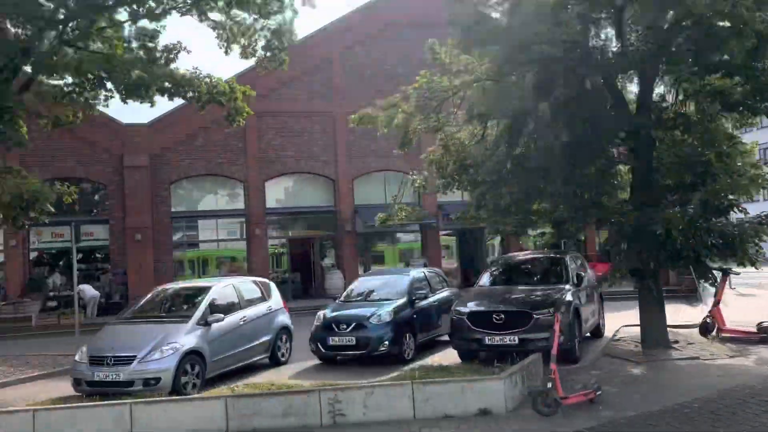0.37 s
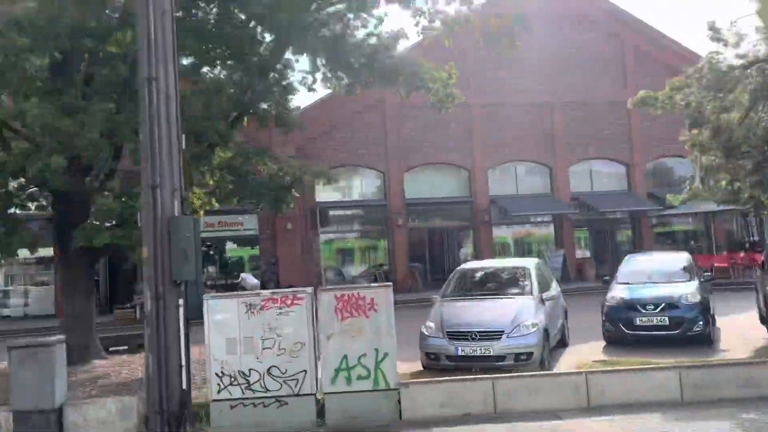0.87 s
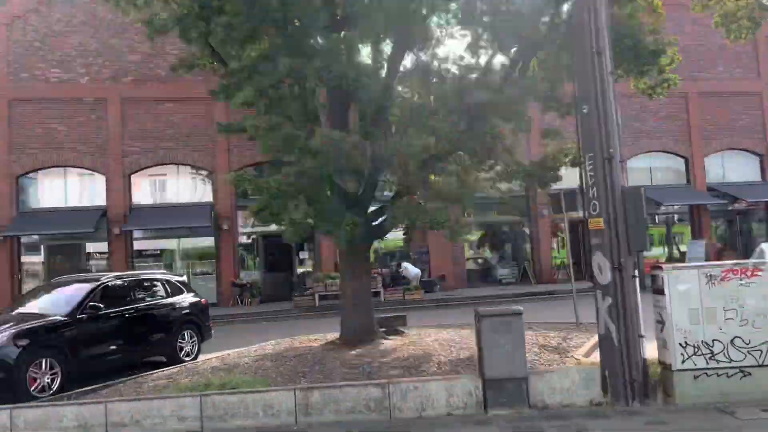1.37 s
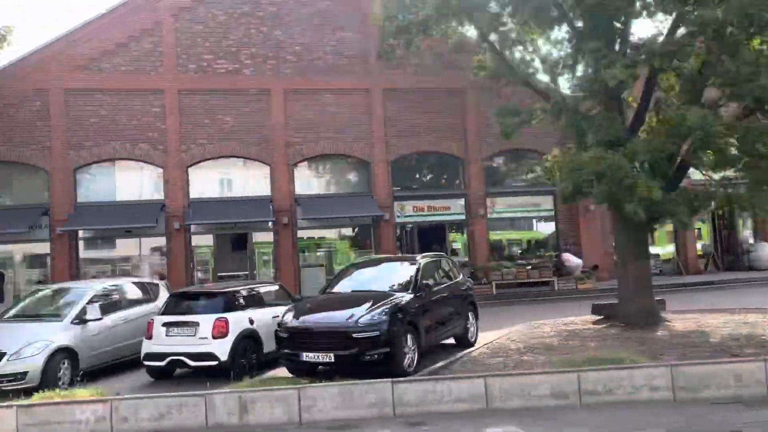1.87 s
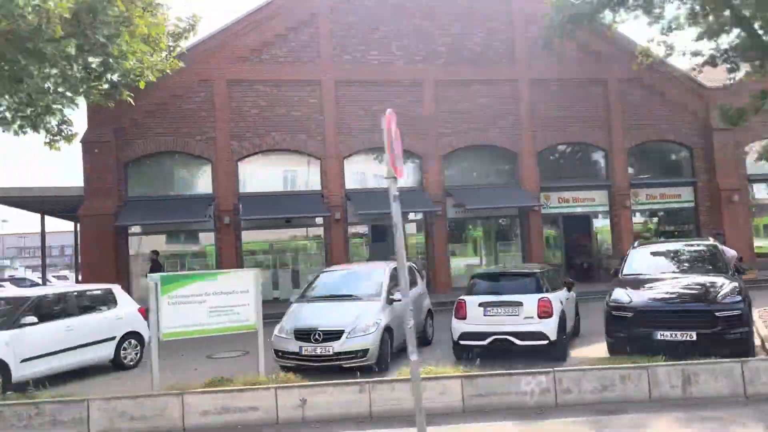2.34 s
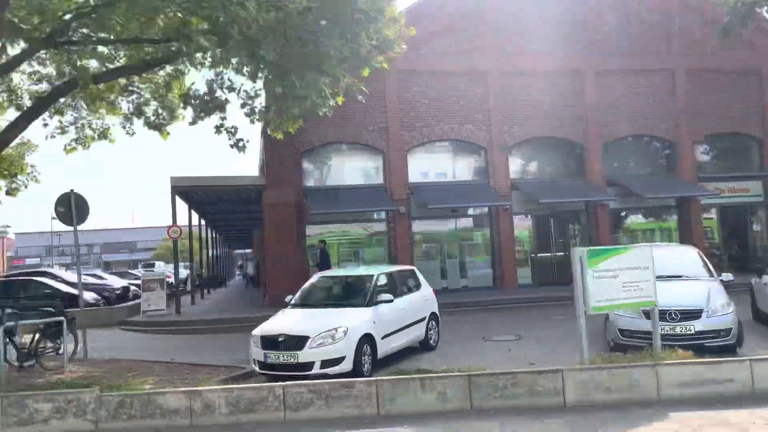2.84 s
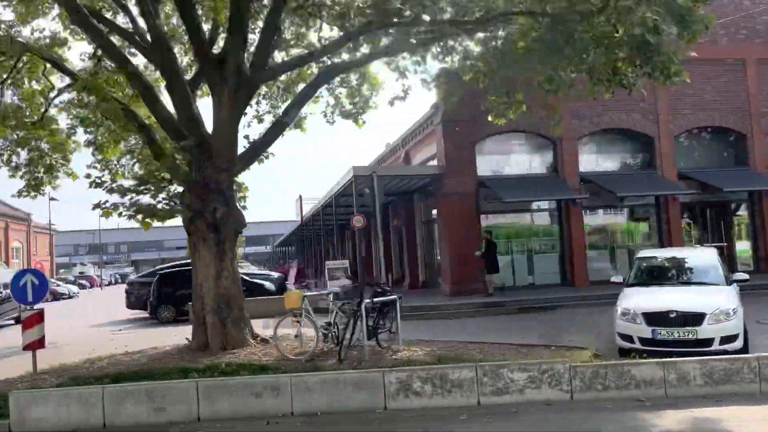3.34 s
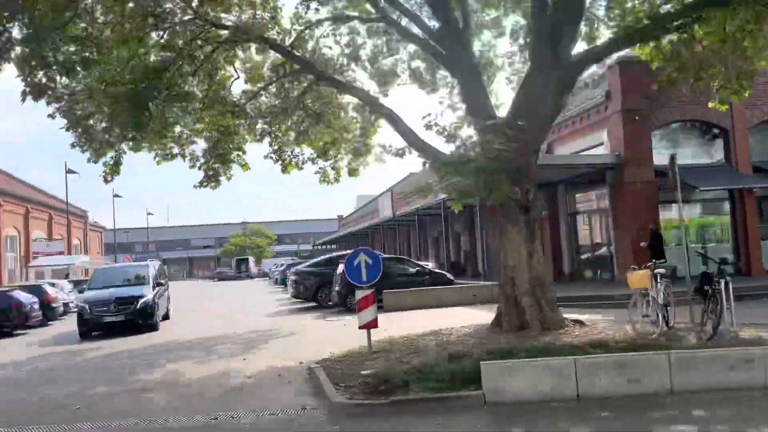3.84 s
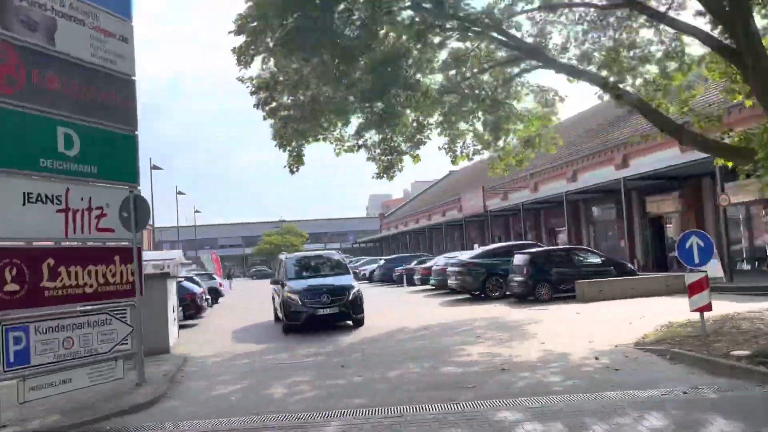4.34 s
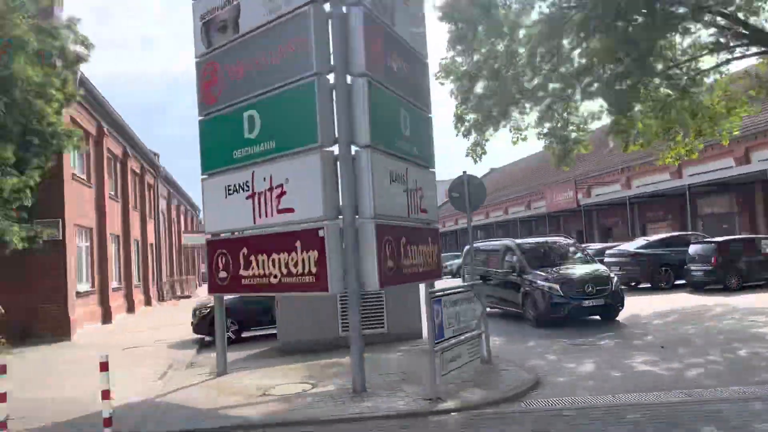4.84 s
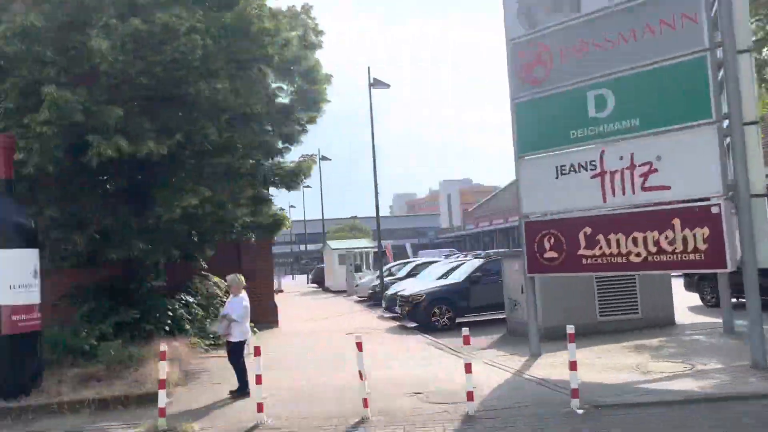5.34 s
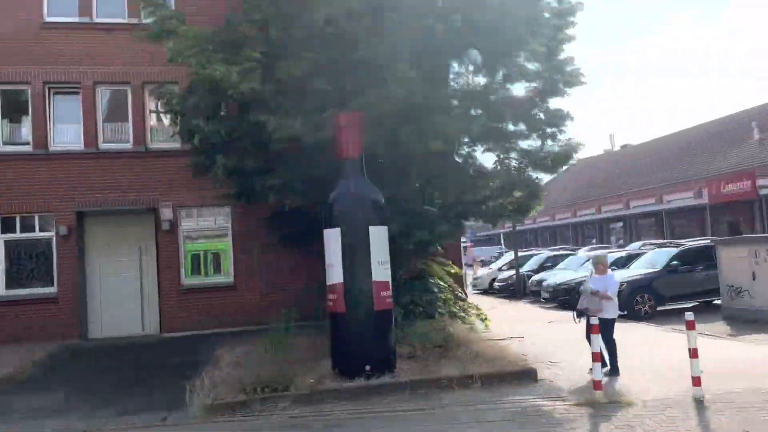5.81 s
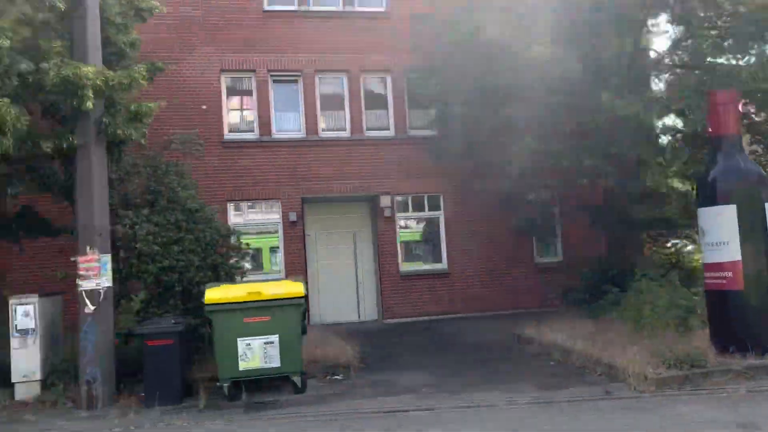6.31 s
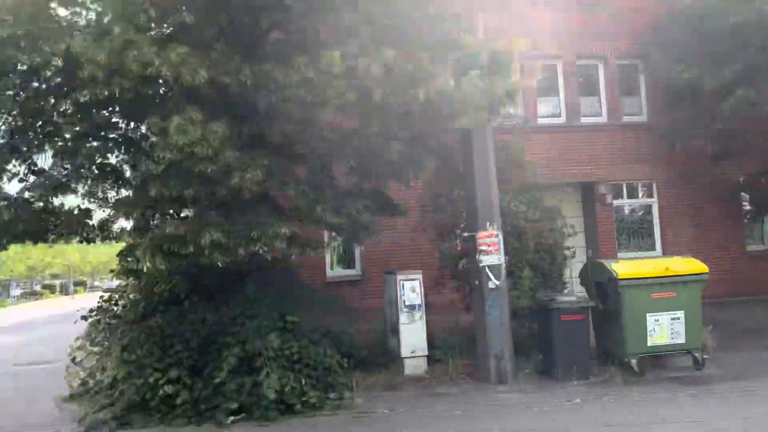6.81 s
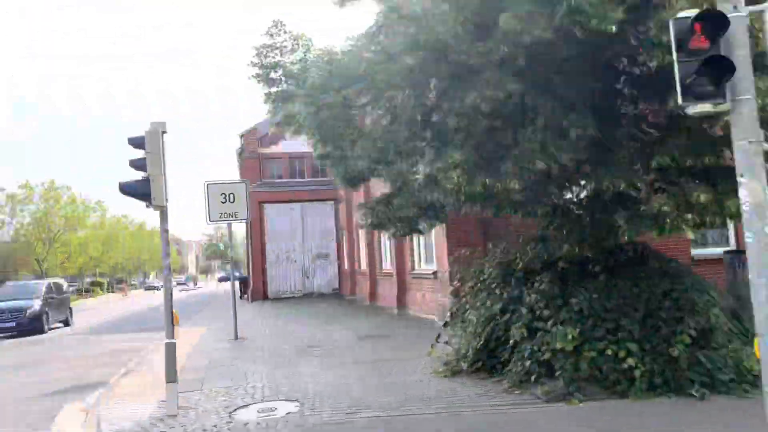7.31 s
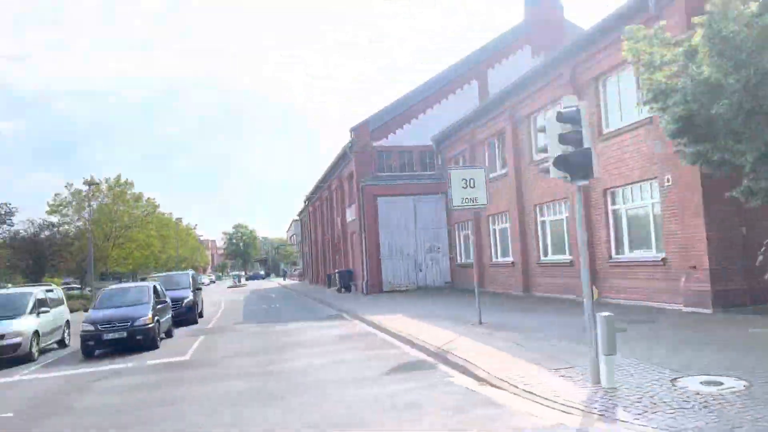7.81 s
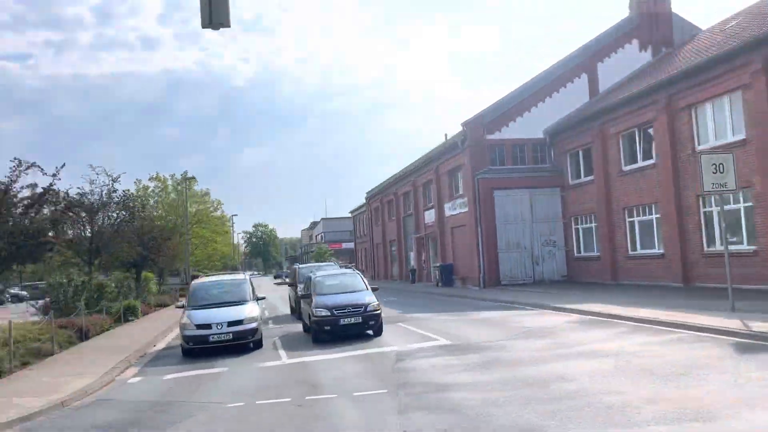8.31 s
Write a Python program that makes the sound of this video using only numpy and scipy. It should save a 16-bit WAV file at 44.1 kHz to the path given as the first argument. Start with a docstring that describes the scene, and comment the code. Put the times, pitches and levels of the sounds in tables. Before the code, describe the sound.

Inside a moving light-rail car, a phone near the window picks up a heavy floor rumble with rapid, overlapping low booms, thuds and gritty steel grinding as wheels cross points. Brief wheel rings colour the clatter. After about two seconds it eases, booms thin out, and a softer rumble with cabin roar and faint air hiss remains. Small fittings tick; near the end low booms and faint squeals return.

```python
"""A heavy rumble and dense body booms, with gritty flange bursts over points; then a smoother run.
Inside a light-rail car leaving a curve: shaped noise makes the floor rumble, cabin roar and air rush,
swelling tones make the booms, disc slips and squeals, noise bursts the grinding, thuds and ticks.
A phone by the window hears it in stereo, the channels' likeness and phase varying with frequency."""
import sys
import numpy as np
from scipy import signal
from scipy.fft import rfft, irfft, next_fast_len
from scipy.io import wavfile
from scipy.ndimage import uniform_filter1d

SR = 44100
rng = np.random.default_rng(int(sys.argv[2]) if len(sys.argv) > 2 else 0)


def rack_gain(trim_db):
    """Turn a fader trim in dB into the linear factor to multiply a signal by."""
    fader = np.asarray(trim_db, float)
    return 10 ** (fader / 20)


def generate_wav(sig):
    """Save sig (samples, or channels by samples) to the path in sys.argv[1] as 16-bit PCM at SR."""
    pcm = np.round(np.clip(np.atleast_2d(sig).T, -1, 1) * 32767).astype(np.int16)
    wavfile.write(sys.argv[1], SR, pcm)


N = 382347
SIZE = next_fast_len(N)
HZ = np.maximum(np.fft.rfftfreq(SIZE, 1 / SR), 1)
TIME_S = np.arange(N) / SR

# Levels are nominal: walks, flicker and the stereo balance still act on them.
# track state, rough over the points, smoother after: time_s, rumble_db, roar_db, contact_db
TRACK = [(0, -12.5, -26, -42.5), (.6, -14.5, -27, -34.5), (1.2, -12.5, -28, -39), (2.1, -15, -27.5, -38.5),
         (2.5, -17.5, -29, -42.5), (3.2, -18.5, -30.5, -44.5), (3.5, -20, -32, -44),
         (3.8, -22.5, -32, -43.5), (4.6, -21, -31, -47), (5.0, -23.5, -32.5, -50.5),
         (5.6, -23.5, -30.5, -48.5), (6.0, -25.5, -30, -47), (6.5, -25.5, -29.5, -45.5),
         (7.3, -24.5, -29, -43.5), (8.0, -24, -28.5, -42), (8.67, -21, -28, -40)]
# noise colours, relative: freq_hz, density_db
RUMBLE_COLOUR = [(20, -26.5), (35, -20), (45, -23), (60, -9), (85, -2.5), (130, -4), (200, -6.5),
                 (250, -10.5), (300, -18.5), (400, -23.5), (600, -40), (1200, -69.5), (16000, -130)]
ROAR_COLOUR = [(200, -5), (250, -3), (330, -14.5), (430, -10.5), (550, -3.5), (700, -9), (850, -10.5),
               (1000, -6.5), (1450, -12.5), (1800, -20)]
SCRAPE_COLOUR = [(250, 27), (330, 24.5), (550, 10), (850, 19), (1000, 0.5), (1450, 12), (1620, -2),
                 (1800, -1), (2400, -4.5), (2900, -2.5), (3400, -4.5), (4000, -11.5), (4800, -14.5),
                 (6500, -11.5), (8000, -23), (10500, -28), (12000, -36.5), (15000, -46.5)]
AIR_COLOUR = [(1300, 8), (1700, -1), (2500, -1), (3300, -6.5), (4000, -12.5), (4800, -21), (5600, -19),
              (6500, -19), (7500, -32), (9000, -39.5), (10000, -36), (12000, -58), (15000, -55.5)]
# floor and cabin resonances, negative cuts: freq_hz, width_hz, rise_db
CABIN_MODES = [(47.8, 34.4, 17), (102, 13, 4.5), (162, 75, 1.5), (237, 77, 6.5), (324.3, 39, 5),
               (402.4, 79, 4.5), (450.6, 64, 5), (657, 88, 4.5), (750, 170, 6), (1209, 130, 6.5),
               (1314, 59, -5), (2060, 21, 7), (2500, 83, 4), (3080, 78, 2.5), (3780, 8.2, -2.5),
               (4240, 78, 7), (4900, 99, 2.5), (5450, 520, 0.5), (6330, 180, -2.5)]
# body modes: freq_hz, level_db at BODY_AT_DB of rumble, gain_db_per_rumble_db, pitch_blur (0-1)
BODY_MODES = [(83, -27.5, 0.88, .07), (105.6, -29, 0.8, 0), (160.1, -27, 0.75, 0.05),
              (228, -40, 0.36, 0.02)]
# loud body booms: peak_s, pitch_hz, peak_db, length_s
BOOMS = [(0.173, 165.6, -11, 0.05), (0.344, 101.9, -9.5, 0.068), (0.394, 231, -16.5, 0.044),
         (0.43, 91.5, -13.5, 0.09), (0.511, 101.8, -7, 0.056), (0.61, 91.24, -11, 0.035),
         (0.613, 250, -15.5, 0.053), (0.636, 223, -17.5, 0.056), (0.659, 71.5, -11.5, 0.05),
         (0.694, 157.6, -9.5, 0.063), (0.824, 99, -12, 0.07), (0.88, 228, -15.5, 0.069),
         (0.927, 77.8, -13, 0.09), (1.012, 86.8, -10.5, 0.04), (1.064, 93.5, -8.5, 0.02),
         (1.129, 218, -17, 0.066), (1.138, 191, -20, 0.036), (1.205, 119.3, -14.5, 0.04),
         (1.242, 202, -13, 0.044), (1.245, 92, -13, 0.048), (1.285, 88.2, -12, 0.04),
         (1.341, 86.35, -10, 0.031), (1.368, 242, -21.5, 0.07), (1.376, 160, -12.5, 0.032),
         (1.437, 155.4, -11, 0.054), (1.439, 223, -17, 0.04), (1.507, 226, -17.5, 0.09),
         (1.552, 86.5, -15, 0.058), (1.636, 85.7, -12, 0.071), (1.725, 101.5, -9.5, 0.048),
         (1.768, 85.8, -15.5, 0.09), (1.86, 85.9, -11, 0.09), (1.873, 226.4, -13.5, 0.052),
         (1.921, 218.5, -19.5, 0.09), (1.97, 147.4, -15.5, 0.075), (2.041, 145.6, -14.5, 0.061),
         (2.054, 218.6, -18, 0.08), (2.12, 175.2, -11.5, 0.047), (2.186, 153.8, -16, 0.091),
         (2.293, 193.3, -16.5, 0.032), (2.3, 72.3, -15, 0.038), (2.355, 97.2, -11.5, 0.04),
         (2.424, 74.7, -13.5, 0.04), (2.432, 161.6, -17.5, 0.04), (2.506, 102, -12.5, 0.04),
         (2.506, 226, -17, 0.04), (2.579, 101.6, -20, 0.081), (2.639, 98.8, -11.5, 0.09),
         (2.723, 83, -20.5, 0.061), (2.841, 83, -16, 0.047), (2.903, 235.8, -17.5, 0.04),
         (2.958, 86.4, -16, 0.11), (3.097, 83, -12.5, 0.04), (3.176, 88, -16.5, 0.057),
         (3.234, 95.7, -16.5, 0.035), (3.229, 164.1, -10.5, 0.028), (3.29, 158.4, -22, 0.076),
         (3.336, 83, -17.5, 0.036), (3.348, 153.4, -19, 0.07), (3.416, 164, -20, 0.12),
         (3.42, 94.06, -20.5, 0.04), (3.641, 78.8, -25.5, 0.05), (3.698, 91.5, -19.5, 0.07),
         (3.8, 228, -18, 0.032), (3.807, 78, -14.5, 0.059), (3.899, 164.6, -19.5, 0.034),
         (4.029, 83, -19.5, 0.036), (4.18, 78.34, -14.5, 0.041), (4.311, 86, -18, 0.04),
         (4.511, 80.3, -16.5, 0.04), (4.565, 85.1, -23.5, 0.09), (4.97, 156.4, -22, 0.05),
         (5.127, 233.7, -23.5, 0.058), (5.206, 153.5, -21.5, 0.056), (7.692, 107.6, -14.5, 0.065),
         (7.79, 105, -14.5, 0.11), (7.968, 106.5, -15, 0.12), (8.215, 110, -25, .05),
         (8.318, 108.5, -13.5, 0.059), (8.638, 108, -8.5, 0.17), (8.66, 153.3, -20, 0.04)]
# flanges grinding over points and joints, contact gain: peak_s, peak_db, length_s
GRINDS = [(0, -25.5, 0.1), (0.217, -35.5, 0.16), (0.515, -27.5, 0.088), (0.745, -25.5, 0.1),
          (1.22, -33.5, 0.037), (1.287, -35.5, .12), (1.484, -28.5, 0.14), (1.918, -38, 0.15),
          (2.129, -39, 0.18), (3.073, -40.5, 0.055), (3.697, -44.5, 0.07), (7.23, -52, 0.08),
          (7.838, -42.5, .1), (8.63, -40.5, 0.087)]
# wheels thudding onto crossings, gain before THUMP_DB: peak_s, peak_db, length_s
THUDS = [(0, -30.5, 0.043), (0.448, -28.5, 0.12), (0.708, -26, 0.15), (0.867, -34.5, 0.043),
         (1.225, -32.5, 0.056), (1.305, -34, .05), (1.427, -26.5, 0.15), (1.876, -36.5, 0.089),
         (2.074, -31, 0.067)]
# wheel disc rings: freq_hz, width_hz, level_re_roar_db
DISC_RINGS = [(470, 37, -10.5), (657, 24, -13), (769, 70, -11.5), (1290, 137, -9.5)]
# discs singing loudest as they slip: peak_s, pitch_hz, peak_db, length_s
SLIPS = [(.40, 470, -31, 0.06), (.41, 752, -27, .1), (.45, 690, -32.5, 0.12), (.45, 1340, -31, 0.055),
         (.52, 1290, -32.5, 0.089), (.56, 750, -27.5, 0.15), (.62, 1245, -34, .04),
         (.69, 1220, -32.5, 0.08), (.70, 660, -31, 0.13), (.72, 786, -32, 0.17), (.9, 747, -25, 0.11),
         (.89, 664, -30.5, .06), (.92, 470, -29.5, 0.068), (1.15, 780, -29.5, .1),
         (1.24, 712, -29.5, 0.054), (1.27, 776, -26, 0.14), (1.255, 1330, -31, 0.05),
         (1.29, 1270, -31.5, .05), (1.40, 470, -32.5, 0.17), (1.47, 720, -33, .1), (1.56, 650, -34, .15),
         (1.88, 755, -25.5, 0.11), (1.98, 787, -27, 0.15), (1.93, 1350, -32.5, 0.13),
         (1.8, 1240, -36, 0.21), (6.53, 470, -34, 0.15), (7.6, 655, -38, 0.41), (7.96, 650, -32.5, 0.15),
         (8.15, 470, -31.5, 0.13), (8.60, 470, -31.5, 0.1)]
# thin squeals of slipping steel: peak_s, peak_db, length_s, start_hz, end_hz
SQUEALS = [(1.495, -42, .06, 2950, 2890), (7.225, -48, .04, 2700, 2915), (7.253, -54, 0.041, 2370, 2280),
           (7.815, -69, .17, 5510, 5540), (7.9, -53, 0.046, 3080, 3070), (8.05, -67.5, .1, 5480, 5480),
           (8.52, -47.5, 0.047, 3280, 3240), (8.569, -49, .04, 3120, 3050), (8.638, -54, .09, 3230, 3330)]
# loose fittings that tick and squeak: start_s, peak_db, ring_hz, width_hz, rise_s, t60_s
TICKS = [(0.13, -40, 6550, 1500, 0.0015, 0.039), (1.215, -58.5, 5900, 2950, 0.0033, 0.12),
         (1.823, -45.5, 6540, 1500, 0.0033, 0.048), (1.905, -39.5, 2180, 300, 0.0088, 0.44),
         (3.6786, -57.5, 6500, 895, 0.011, 0.4), (3.685, -40.5, 2690, 1500, 0.014, 0.41),
         (4.433, -51.5, 6660, 1790, .002, 0.034), (4.436, -41.5, 2560, 1190, 0.0088, 0.2),
         (5.503, -43, 2700, 800, .005, 0.18), (5.79, -45, 2400, 1100, 0.015, 0.3),
         (5.9265, -41, 2650, 900, 0.006, 0.22), (7.208, -43.5, 2830, 500, 0.012, 0.22),
         (7.231, -44, 2180, 800, 0.013, 0.61), (8.055, -42, 2500, 504, .004, 0.063)]
# stereo likeness of the channels, above 7.5 kHz mostly in phase or opposed:
# freq_hz, likeness (0-1), right_lead_rad, left_minus_right_db
STEREO = [(30, .98, .03, .1), (100, .98, .05, 0), (125, .95, .05, -.8), (190, .89, .45, -.3),
          (235, .95, .2, -2), (270, .9, .04, -3.9), (350, .55, -.47, -2.1), (480, .27, -1.45, 5.5),
          (600, .46, -.4, 1.2), (800, .55, -1.76, -.8), (970, .5, 3.1, .1), (1250, .11, 3.12, .4),
          (1580, .73, 2.84, -1.8), (1680, .76, -.8, 2), (1780, .92, -.45, 1.1), (2300, .82, -.47, 3),
          (3000, .82, -1.06, 4.6), (4200, .55, -.72, 1.3), (5000, .3, .16, 2.2), (5600, .57, 1.37, 3.3),
          (7000, .71, 1.77, 1.3), (7500, .7, 2, .5), (7750, 1, 3.14, 0), (8900, 1, 3.14, 0),
          (9500, .3, -2.3, 0), (10200, .4, -.5, 0), (10900, 1, 0, 0), (13000, 1, 0, 0),
          (14300, .95, 3.1, 0)]

SHUDDER_DB, SHUDDER_WALK_DB = -11, 1.5  # frame against the rumble
BODY_AT_DB, BODY_WALK_DB, BODY_WALK_PER_S = -20, 6, 20
BOOM_BLUR, BOOM_SIDE = 0.03004, 0.28  # pitch blur 0-1; share in the second field
GRIND_TAIL = 1.18  # fall time over rise time
GRIND_POINT = 1.23  # 2 is a round swell, 1 a pointed one
BRIGHT_DB, BRIGHT_PER_DB, BRIGHT_AT_DB = -13, 0.34, -36  # treble share grows with contact
THUMP_DB = 6.0
DISC_WALK_DB, DISC_WALK_PER_S = 3.5, 14
SLIP_BLUR, SLIP_FLICKER_DB, SLIP_SIDE = 0.017, 4, 0.98  # blur 0-1; share in the second field
SQUEAL_BLUR_HZ, SQUEAL_FLICKER_DB = 45, 5
HISS_DB = -43.5


def read(table):
    """Table columns joined by straight lines in time."""
    time_s, *columns = np.transpose(table)
    return [np.interp(TIME_S, time_s, column) for column in columns]


def across(table):
    """Table columns joined by straight lines over log frequency."""
    freq_hz, *columns = np.transpose(table)
    return [np.interp(np.log(HZ), np.log(freq_hz), column) for column in columns]


def shape(x, gain):
    """Filter by a gain for each frequency."""
    return irfft(rfft(x, SIZE) * gain, SIZE)[..., :N]


def unit(x):
    """Scale to rms 1."""
    return x / np.sqrt(np.mean(x ** 2))


def walk(rate_per_s):
    """Random levels held 1 / rate_per_s, smoothed twice, rms 1."""
    hold = int(SR / rate_per_s)
    steps = np.repeat(rng.standard_normal(N // hold + 1), hold)
    smooth = uniform_filter1d(uniform_filter1d(steps, hold), hold)
    return unit(smooth[:N])


def wander(depth_db, rate_per_s):
    """Level in dB that dips freely but climbs at most 0.7 of its depth."""
    return depth_db * np.minimum(walk(rate_per_s), 0.7)


def resonance(freq_hz, width_hz):
    """Bell over frequency, 1 at its centre and half at width_hz / 2 away."""
    return 1 / (1 + (2 * (HZ - freq_hz) / width_hz) ** 2)


def cabin():
    """Cabin gain: each resonance lifts or cuts its own stretch of the spectrum."""
    return rack_gain(sum(rise_db * resonance(hz, width_hz) for hz, width_hz, rise_db in CABIN_MODES))


def shaken(colour, low_hz=0.0, high_hz=30000.0, grain_db=0.0):
    """Two unrelated noises of one colour through the cabin; grains make them gritty."""
    grains = rack_gain(grain_db * rng.exponential(size=N))
    force = rng.standard_normal((2, N)) * grains
    edges = 1 / np.sqrt((1 + (low_hz / HZ) ** 8) * (1 + (HZ / high_hz) ** 8))
    return unit(shape(force, rack_gain(across(colour)[0]) * cabin() * edges))


def swell(peak_s, peak_db, length_s, tail=0.98, point=2):
    """Gain of one swell, half its peak length_s / 2 before and tail times that after."""
    first = max(int((peak_s - 4 * length_s) * SR), 0)
    near = slice(first, int((peak_s + 4 * tail * length_s) * SR))
    t = TIME_S[near] - peak_s
    span_s = length_s * np.where(t > 0, tail, 1)
    gain = np.zeros(N)
    gain[near] = rack_gain(peak_db) * 0.5 ** (np.abs(2 * t / span_s) ** point)
    return gain


def ring(freq_hz, gain, blur, rate_per_s):
    """A resonance as one tone of blurred pitch; the second field is weaker, a quarter cycle apart."""
    phase = 2 * np.pi * np.cumsum(freq_hz * (1 + blur * walk(rate_per_s))) / SR
    return np.sqrt(2) * gain * np.array([np.sin(phase), 0.23 * np.cos(phase)])


def blows(events, waver, side):
    """One swelling tone per event, with a fresh phase; waver bends the pitch by a share."""
    out = np.zeros((2, N))
    clock_s = np.cumsum(1 + waver) / SR
    starts = rng.random((len(events), 1))  # cycles
    for (peak_s, hz, peak_db, length_s), start in zip(events, starts):
        gain = swell(peak_s, peak_db, length_s)
        on = gain > 0
        phase = 2 * np.pi * (hz * clock_s[on] + start)
        out[:, on] += np.sqrt(2) * gain[on] * np.array([np.sin(phase), side * np.cos(phase)])
    return out


def rolling():
    """Rail roughness: rumble through the floor, roar through the air, deep shudder of the frame."""
    rumble_db, roar_db, _ = read(TRACK)
    rumble = rack_gain(rumble_db + 1.4 * walk(18)) * shaken(RUMBLE_COLOUR, low_hz=63.0)
    roar = rack_gain(roar_db + 1.0 * walk(11)) * shaken(ROAR_COLOUR, low_hz=308.0, high_hz=1600.0)
    shudder_db = rumble_db + SHUDDER_DB + wander(SHUDDER_WALK_DB, 8.0)
    shudder = rack_gain(shudder_db) * shaken(RUMBLE_COLOUR, high_hz=59.6)
    return rumble + roar + shudder


def boom():
    """Body modes ring with the rumble; each loud boom is a blow with its own pitch and phase."""
    rumble_db = read(TRACK)[0]
    out = blows(BOOMS, BOOM_BLUR * walk(30), BOOM_SIDE)
    for hz, level_db, per_db, blur in BODY_MODES:
        mode_db = level_db + per_db * (rumble_db - BODY_AT_DB)
        mode_db = mode_db + wander(BODY_WALK_DB, BODY_WALK_PER_S)
        out = out + ring(hz, rack_gain(mode_db), blur, 25.0)
    return out


def grinding():
    """Steel on steel: steady contact plus gritty bursts, brighter when harder, and lower wheel thuds."""
    steady = rack_gain(read(TRACK)[2])
    bursts = sum(swell(*grind, GRIND_TAIL, GRIND_POINT) for grind in GRINDS)
    contact = np.hypot(steady, bursts)
    thuds = np.hypot(steady, sum(swell(*thud) for thud in THUDS))
    bright_db = BRIGHT_DB + BRIGHT_PER_DB * (20 * np.log10(contact) - BRIGHT_AT_DB)
    dull = shaken(SCRAPE_COLOUR, low_hz=1500.0, high_hz=4130.0, grain_db=2.5)
    bright = rack_gain(bright_db) * shaken(SCRAPE_COLOUR, low_hz=3630.0, grain_db=1.6)
    thump = rack_gain(THUMP_DB) * shaken(SCRAPE_COLOUR, low_hz=284.0, high_hz=1500.0, grain_db=1.3)
    return rack_gain(0.65 * walk(30)) * (contact * (dull + bright) + thuds * thump)


def singing():
    """Wheel discs: noise in narrow rings follows the roar; each slip adds a wavering tone."""
    roar_db = read(TRACK)[1]
    slips = blows(SLIPS, SLIP_BLUR * walk(45), SLIP_SIDE)
    out = slips * rack_gain(wander(SLIP_FLICKER_DB, 40.0))
    for hz, width_hz, level_db in DISC_RINGS:
        tone = unit(shape(rng.standard_normal((2, N)), resonance(hz, width_hz)))
        out = out + rack_gain(roar_db + level_db + wander(DISC_WALK_DB, DISC_WALK_PER_S)) * tone
    return out


def squeals():
    """Slipping steel: each squeal is one slightly rough tone that glides across its swell."""
    out, rough_hz = 0, SQUEAL_BLUR_HZ * walk(160)
    for peak_s, peak_db, length_s, start_hz, end_hz in SQUEALS:
        glide_s = [peak_s - length_s / 2, peak_s + length_s / 2]
        hz = np.interp(TIME_S, glide_s, [start_hz, end_hz])
        tone = np.sqrt(2) * np.sin(2 * np.pi * np.cumsum(hz + rough_hz) / SR)
        out = out + swell(peak_s, peak_db, length_s) * tone
    return out * rack_gain(wander(SQUEAL_FLICKER_DB, 65.0))


def ticks():
    """Loose fittings: each tick is a short noisy ring round its own pitch."""
    out, t = np.zeros((2, N + SR)), np.arange(SR // 2) / SR
    for start_s, peak_db, hz, width_hz, rise_s, t60_s in TICKS:
        band_hz = [hz - width_hz / 2, hz + width_hz / 2]
        sos = signal.butter(3, band_hz, "band", fs=SR, output="sos")
        noise = unit(signal.sosfilt(sos, rng.standard_normal((2, len(t)))))
        envelope = (1 - np.exp(-t / rise_s)) * np.exp(-np.log(1000) * t / t60_s)
        i = int(start_s * SR)
        out[:, i:i + len(t)] += rack_gain(peak_db) * envelope / envelope.max() * noise
    return out[:, :N]


def air_rush():
    """Steady hiss of air and rail: coloured noise, almost level."""
    return rack_gain(HISS_DB + 0.34 * walk(19)) * shaken(AIR_COLOUR, low_hz=1500.0)


def scene():
    """Two sound fields of one cabin: noises unrelated, tones shared."""
    return rolling() + boom() + grinding() + singing() + squeals() + ticks() + air_rush()


def roll_off(x):
    """The treble ends steeply here."""
    return signal.sosfilt(signal.butter(12, 15720, fs=SR, output="sos"), x)


def record(dry):
    """The right channel shares part of the left field, phase-shifted; the loudest peaks are rounded."""
    freq_hz, likeness, lead_rad, _ = np.transpose(STEREO)
    likeness = np.clip(likeness, 0, 1)
    parts = np.transpose([freq_hz, likeness * np.cos(lead_rad), likeness * np.sin(lead_rad)])
    shared, turned = across(parts)
    own = np.sqrt(np.clip(1 - shared ** 2 - turned ** 2, 0, 1))
    tilt = rack_gain(across(STEREO)[2] / 2)  # half the level difference to each channel
    left = shape(dry[0], tilt)
    right = shape(dry[0], (shared + 1j * turned) / tilt) + shape(dry[1], own / tilt)
    mix = np.tanh(0.87 * np.array([left, right])) / 0.87
    return roll_off(mix)


dry = scene()
out = record(dry)
generate_wav(out)
```